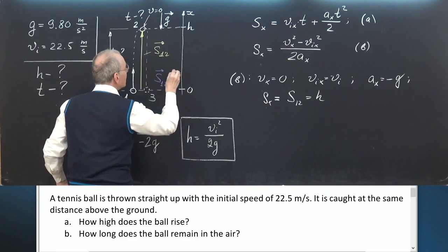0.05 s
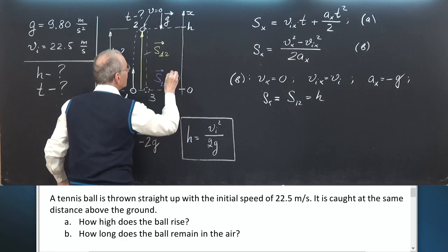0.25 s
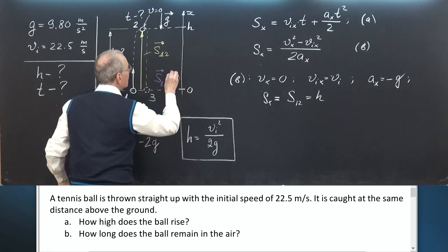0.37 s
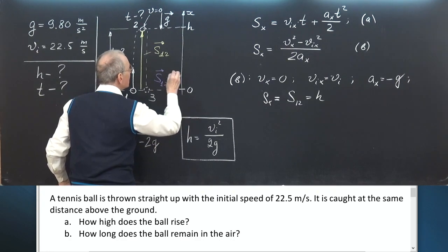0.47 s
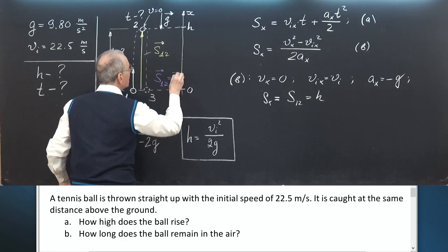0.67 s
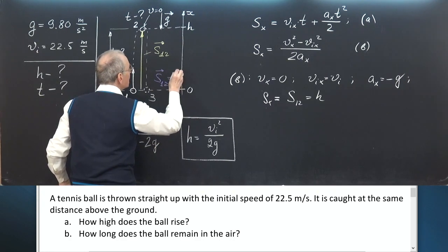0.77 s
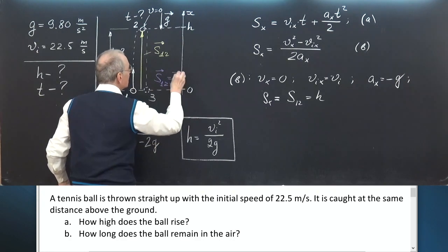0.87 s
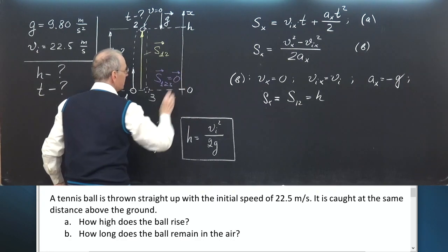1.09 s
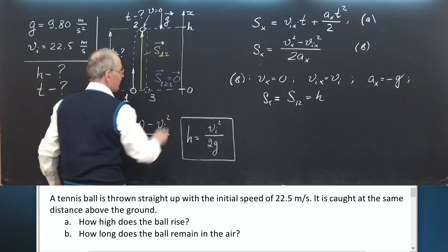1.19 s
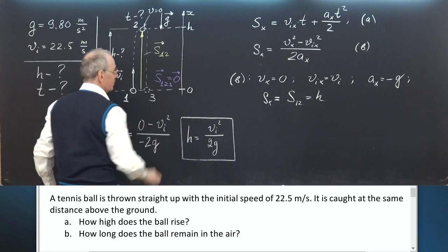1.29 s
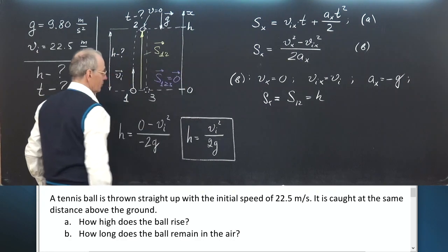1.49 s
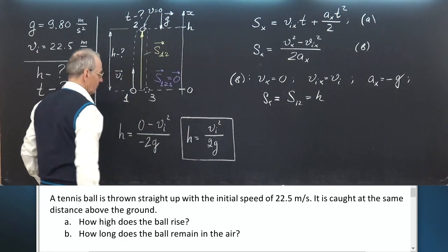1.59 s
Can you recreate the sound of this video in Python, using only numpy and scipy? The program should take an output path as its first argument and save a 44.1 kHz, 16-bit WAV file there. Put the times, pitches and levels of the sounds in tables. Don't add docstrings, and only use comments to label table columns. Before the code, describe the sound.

Chalk writing on a blackboard: one sharp knock, quick soft scratches, then a light shoe scuff

```python
import sys
import numpy as np
from scipy import signal
from scipy.fft import rfft, irfft
from scipy.io import wavfile
from scipy.ndimage import uniform_filter1d

SR = 44100
rng = np.random.default_rng(int(sys.argv[2]) if len(sys.argv) > 2 else 0)


def dump(signal):
    limited = np.clip(np.atleast_2d(signal).T, -1, 1)
    pcm = np.round(limited * 32767).astype(np.int16)
    wavfile.write(sys.argv[1], SR, pcm)


def elevation(decibels):
    levels = np.asarray(decibels, float)
    return 10 ** (levels / 20)


N = 72765


def level(x, db):
    return x * elevation(db) / np.sqrt(np.mean(x ** 2))


def cut(x, hz, kind, order=2):
    return signal.sosfilt(signal.butter(order, hz, kind, fs=SR, output="sos"), x)


def colour(x, table):
    f = np.fft.rfftfreq(N, 1 / SR) + 1
    hz, db = np.array(table).T
    gain = elevation(np.interp(np.log(f), np.log(hz), db, left=-70))
    return level(irfft(rfft(x) * gain, N), 0)


def ring(x, modes, mixed_above_hz=20000):
    out = 0
    for k, (hz, db, t60) in enumerate(modes):
        pole = np.exp(2j * np.pi * hz / SR - np.log(1000) / (t60 * SR))
        sign = -(-1) ** (k * (hz > mixed_above_hz))
        out = out + sign * elevation(db) * signal.lfilter([1], [1, -pole], x).imag
    return out


def grains(per_s, scatter_db):
    biggest_db = 10
    chance, side, size = rng.random((3, N))
    size_db = np.minimum(-scatter_db * np.log(1 - size), biggest_db)
    return (chance < per_s / SR) * np.sign(side - .5) * elevation(size_db)


def walk(rate):
    k = int(SR / rate)
    steps = np.repeat(rng.standard_normal(N // k + 1), k)
    return level(uniform_filter1d(uniform_filter1d(steps, k), k)[:N], 0)


def pushes(hits):
    t, out = np.arange(N) / SR, np.zeros(N)
    for start, db, contact_ms in hits:
        u = np.maximum(t - start, 0) * 8000 / contact_ms
        push = u ** 2 * np.exp(-u)
        out += elevation(db) * push / push.sum()
    return out


def swell(start, top, end):
    range_db = 16.5
    u = np.interp(np.arange(N) / SR, [start, top, end], [0, 1, 0])
    return elevation(-range_db * (1 - u) ** 2) * np.minimum(u * 8, 1)


def hush():
    # f/Hz, level/dB [per Hz]
    air_spectrum = [(28, -19), (50, -5.5), (190, -0.5), (420, -5), (900, -11.5), (2240, -17.5),
                    (5030, -23.5), (15700, -33.5)]
    hush_db, flicker_db = -58, .6
    whine_hz, whine_db, whine_flicker_db = 13754, -88.5, 2
    air = rfft(colour(rng.standard_normal(N), air_spectrum))
    octave = np.log2((np.fft.rfftfreq(N, 1 / SR) + 1) / 20)
    bands = 0
    for k in range(11):
        band = irfft(air * np.clip(1 - abs(octave - k), 0, 1), N)
        bands = bands + band * elevation(flicker_db * walk(7.9))
    tone = np.sqrt(2) * np.sin(2 * np.pi * whine_hz * np.arange(N) / SR)
    return level(bands, hush_db) + elevation(whine_db + whine_flicker_db * walk(27)) * tone


def strokes():
    # start t/s, fastest t/s, end t/s, hiss level/dB, board rumble level/dB
    gestures = [
        (0.237, 0.265, 0.44, -61, -53.5),
        (0.399, 0.53, 0.569, -56, -50.5),
        (0.555, 0.618, 0.706, -62.5, -53.5),
        (0.694, 0.736, 0.82, -60.5, -47.5),
        (0.803, 0.815, .865, -63, -54),
        (0.825, 0.885, .92, -62, -54.5),
        (0.122, .155, 0.19, -82, -55),
    ]
    # f/Hz, level/dB [per Hz]
    chalk = [(710, -21), (1200, -2), (1730, -2.5), (1860, -4.5), (3180, -8), (4880, -4.5), (6110, -9.5),
             (11700, -11), (15500, -17.5)]
    # f/Hz, level/dB, t60/s
    rubbed = [(221.4, -1, 0.078), (352, 3.5, 0.023), (474, -0.5, 0.031), (646, -4, 0.029),
              (830, -1.5, 0.016), (1030, -10, 0.019), (1354, -7, 0.01), (1662, -8, 0.025),
              (2326, -22, 0.09)]
    # t/s, level/dB, contact/ms
    touches = [
        (0.17, -48.5, 0.35),
        (.596, -53, 2.6),
        (.606, -36, 6.5),
        (.7625, -44, 0.92),
    ]
    # t/s, level/dB, contact/ms, lowest ringing f/Hz
    landings = [
        (.7165, -44, 1.6, 330),
        (.729, -48, 1.6, 330),
        (.8095, -46, .45, 650),
        (.8135, -49, .45, 650),
    ]
    grit_per_s, grit_scatter_db = 8600, -1.5
    slips_per_s, slip_scatter_db = 2200, 0.5
    air_hz, fast_db, air_slope = 6370, -58, 1.38
    rub_low_hz = 144
    hiss, air, load = np.zeros((3, N))
    for start, top, end, hiss_db, board_db in gestures:
        speed = swell(start, top, end)
        hiss = hiss + elevation(hiss_db) * speed
        load = load + elevation(board_db) * speed
        air = air + elevation(fast_db + air_slope * (hiss_db - fast_db)) * speed
    grit = colour(grains(grit_per_s, grit_scatter_db), chalk)
    slips = grains(slips_per_s, slip_scatter_db)
    board = ring(slips * load, rubbed) / np.std(ring(slips, rubbed))
    board = board + ring(pushes(touches), rubbed)
    for start, db, contact_ms, low_hz in landings:
        board = board + cut(ring(pushes([(start, db, contact_ms)]), rubbed), low_hz, "high")
    low = cut(grit, air_hz, "low", order=1)
    return hiss * low + air * (grit - low) + cut(board, rub_low_hz, "high")


def taps():
    # t/s, level/dB, contact/ms
    strikes = [
        (.2461, -21, 0.95),
    ]
    # f/Hz, level/dB, t60/s
    board = [(102.7, -17, 0.36), (187.3, 1, 0.078), (232, -41, 0.17), (360, -15.5, 0.13),
             (486, -19.5, 0.061), (638, -21, 0.092), (855, -1.5, 0.019), (1090, -5, 0.024),
             (1290, -10, 0.06), (1550, -5.5, 0.045), (1802, -16, 0.11), (2520, -30, 0.042),
             (3300, -27, .03), (4770, -28, .03)]
    click_db, ring_lag_ms = 3, 0.68
    crack_db, crack_t60_s, crack_low_hz, crack_top_hz = -25, 0.039, 3500, 8000
    rattle_db, rattle_t60_s, rattle_low_hz, rattle_top_hz = -16, 0.063, 540, 3000
    shudder_db, shudder_t60_s, shudder_low_hz, shudder_top_hz = -2.5, 0.62, 100, 246
    force = pushes(strikes)

    def fade(t60):
        return signal.lfilter([1], [1, -np.exp(-np.log(1000) / (t60 * SR))], force)

    def band(low_hz, top_hz):
        return cut(cut(rng.standard_normal(N), top_hz, "low"), low_hz, "high", order=1)

    late = pushes([(start + ring_lag_ms / 1000, db, contact_ms) for start, db, contact_ms in strikes])
    crack = elevation(crack_db) * fade(crack_t60_s) * band(crack_low_hz, crack_top_hz)
    rattle = elevation(rattle_db) * fade(rattle_t60_s) * band(rattle_low_hz, rattle_top_hz)
    wall = cut(band(shudder_low_hz, shudder_top_hz), shudder_low_hz, "high")
    onset = uniform_filter1d(fade(shudder_t60_s), size=801, origin=400)
    shudder = elevation(shudder_db) * onset * wall
    click = elevation(click_db) * 15 * force
    return ring(late, board, mixed_above_hz=400) + click + rattle + shudder + crack


def writer():
    # start t/s, peak t/s, end t/s, level/dB, upper band edge f/Hz
    sleeve = (0.87, 1.27, 2, -68.5, 4489)
    # t/s, level/dB
    scuffing = [(.9, -86), (1.05, -73), (1.18, -61), (1.3, -63), (1.4, -57), (1.48, -53), (1.53, -52),
                (1.575, -46.5), (1.62, -53.5), (1.65, -52)]
    # f/Hz, level/dB [per Hz]
    scuff_spectrum = [(70, -19), (150, -11.5), (210, -1), (320, -12.5), (620, -7.5), (1400, -17),
                      (3000, -26), (15000, -53)]
    # t/s, level/dB, contact/ms
    heel = [
        (1.3563, -38.5, 1.1),
        (1.3608, -44, 1.23),
        (1.3650, -40.5, 1.05),
        (1.3685, -45, 0.65),
        (1.380, -48.5, 0.71),
        (1.390, -49.5, 2.2),
    ]
    # t/s, level/dB, contact/ms
    catches = [
        (1.53, -56, .8),
        (1.565, -54, .5),
        (1.582, -54.5, 1),
        (1.607, -57.5, .35),
        (1.643, -59, .4),
    ]
    # f/Hz, level/dB, t60/s
    floor = [(116.7, -18, 0.87), (186.4, -11.5, 0.36), (348, -15, 0.026), (472, 2, 0.041),
             (526, -4.5, 0.037), (603, -1.5, 0.044), (680, -3.5, 0.039), (755, 0.5, 0.054),
             (1010, -9, 0.026), (1300, -6.5, 0.043), (1640, -9, 0.042)]
    scuff_per_s, scatter_db, flutter_db = 2500, 3.5, 1.5
    t, db = np.array(scuffing).T
    effort = np.interp(np.arange(N) / SR, t, db) + flutter_db * walk(39.8)
    scuff = elevation(effort) * colour(grains(scuff_per_s, scatter_db), scuff_spectrum)
    start, top, end, sleeve_db, hz = sleeve
    swish = cut(cut(rng.standard_normal(N), hz, "low", order=1), hz / 2, "high", order=1)
    swish = swell(start, top, end) * level(swish, sleeve_db)
    return ring(pushes(heel + catches), floor) + scuff + swish


def room(near):
    t60_s, delay_s, low_hz, top_hz = 0.25, 0.0042, 254, 2400
    t = np.arange(SR // 2) / SR
    tail = rng.standard_normal(len(t)) * elevation(-60 * t / t60_s) * (t > delay_s)
    tail = cut(cut(tail, top_hz, "low", order=1), low_hz, "high", order=1)
    return signal.fftconvolve(near, tail / np.sqrt(np.sum(tail ** 2)))[:N]


def scene():
    radiate_hz, room_db = 92, -17
    near = cut(strokes() + taps() + writer(), radiate_hz, "high")
    return (near + elevation(room_db) * room(near) + hush())[None]


def roll_off(x):
    return signal.sosfilt(signal.butter(12, 15750, fs=SR, output="sos"), x)


def record(dry):
    top_hz = 15780
    top = signal.ellip(12, .3, 60, top_hz, fs=SR, output="sos")
    return roll_off(signal.sosfilt(top, dry))


dry = scene()
out = record(dry)
dump(out)
```